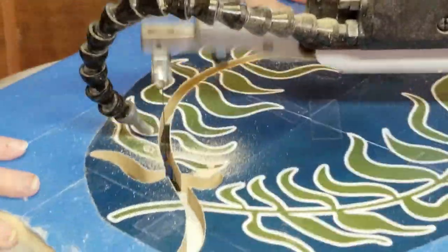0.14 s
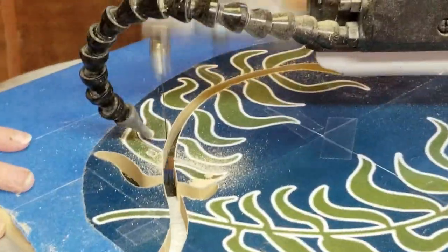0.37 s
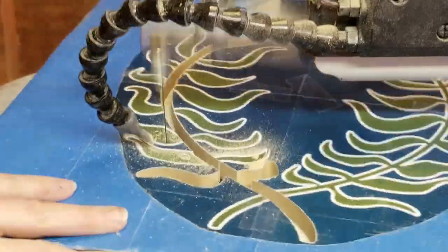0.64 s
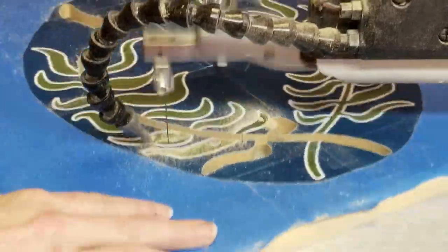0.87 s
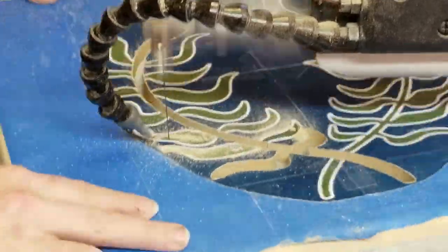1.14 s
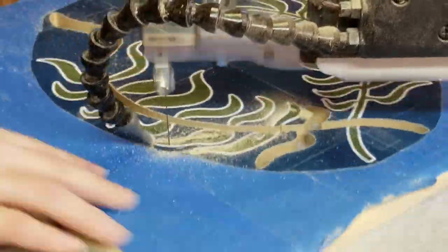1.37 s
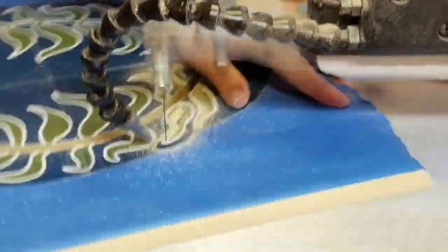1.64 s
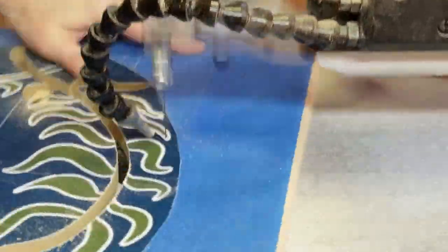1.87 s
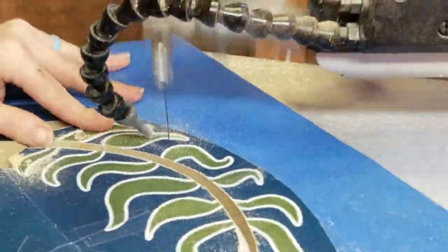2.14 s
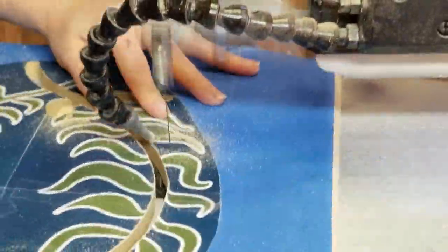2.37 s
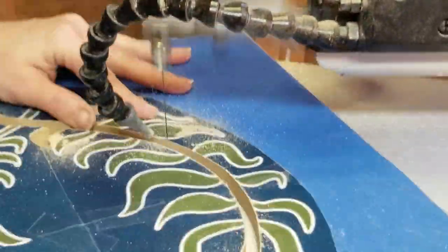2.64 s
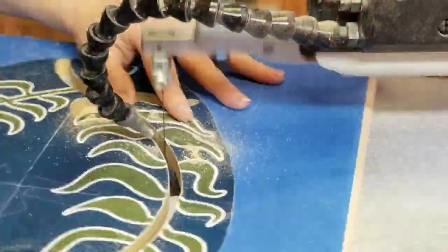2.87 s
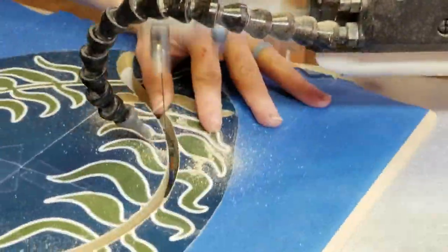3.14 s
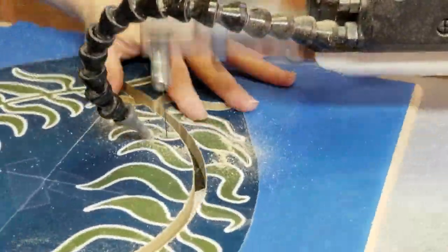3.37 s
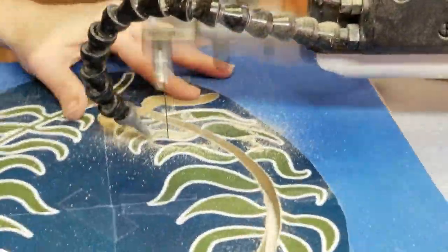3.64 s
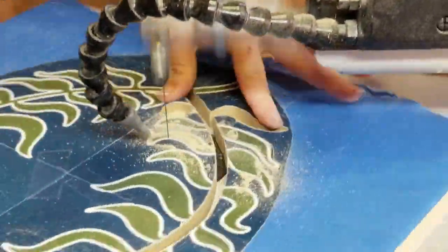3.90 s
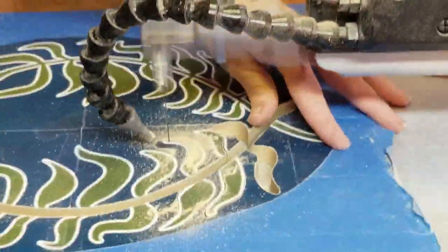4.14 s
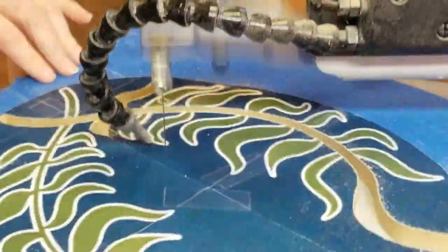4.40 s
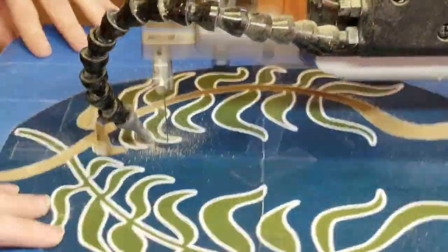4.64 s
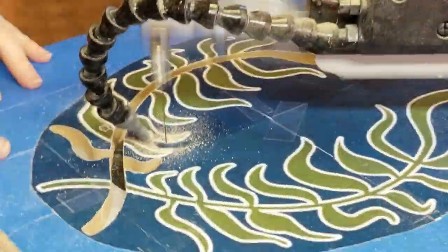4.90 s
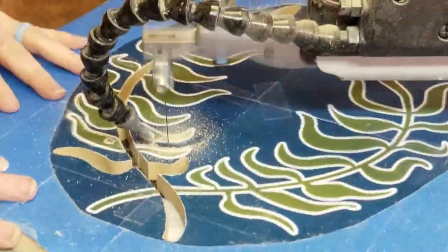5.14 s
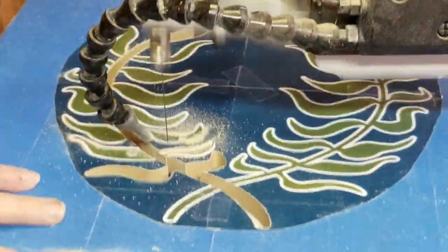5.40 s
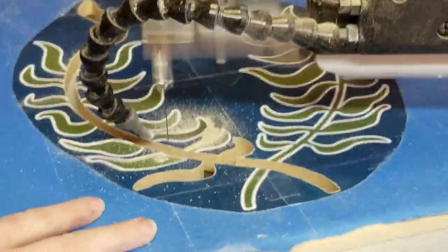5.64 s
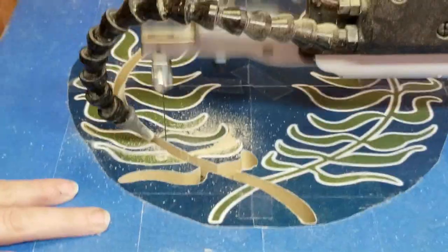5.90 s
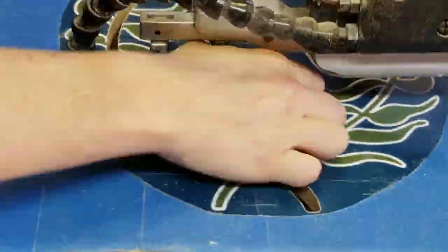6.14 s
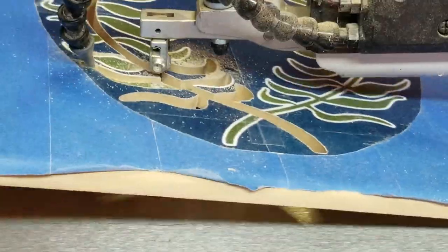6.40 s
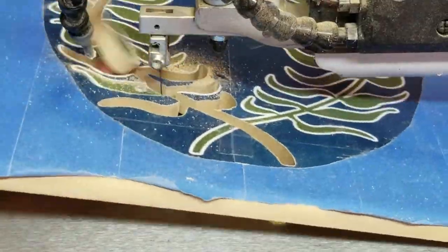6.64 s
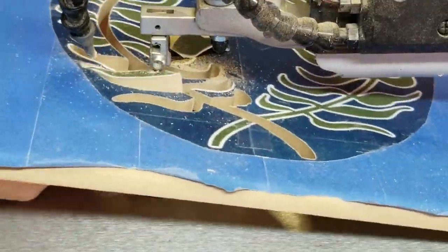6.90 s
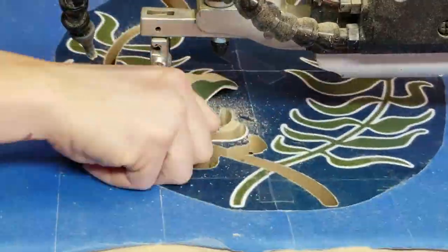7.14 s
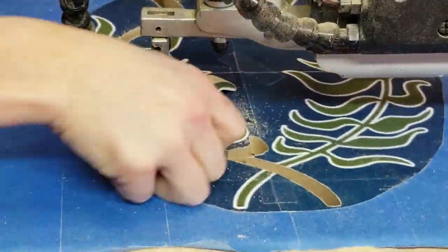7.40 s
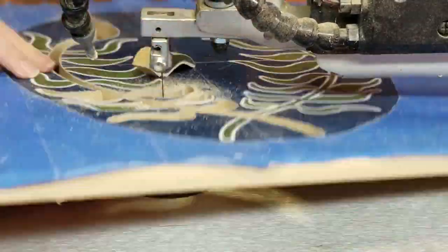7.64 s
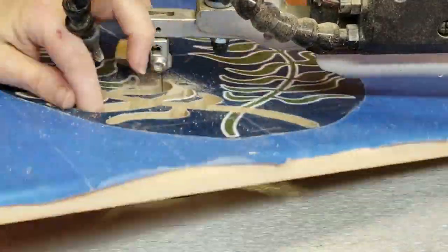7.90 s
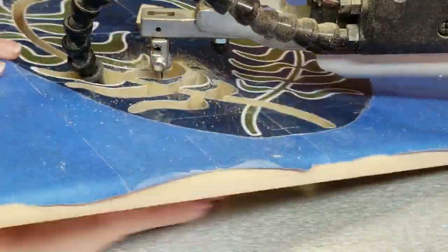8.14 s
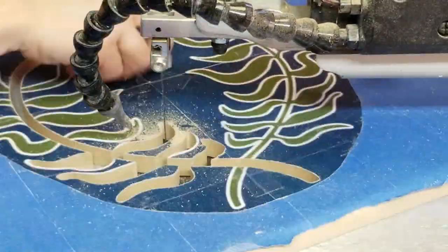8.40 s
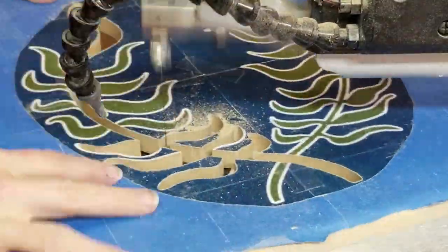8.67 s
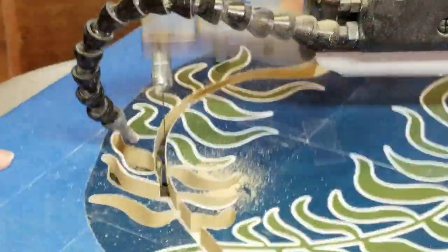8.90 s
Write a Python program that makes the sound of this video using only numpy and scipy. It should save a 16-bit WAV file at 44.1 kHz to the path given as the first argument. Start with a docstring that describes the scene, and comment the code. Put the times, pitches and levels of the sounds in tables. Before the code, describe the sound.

A scroll saw cuts a thin wooden panel close by in a workshop, a sped-up, harsh buzzing chord with gritty tooth hiss that swells and fades as the panel turns. At six seconds it stops with a dull thump. Rapid clicks, taps and scrapes of wood follow, with a brief squeak, before a whine climbs and the buzz resumes.

```python
"""A scroll saw cuts a thin wooden panel in a workshop, heard at many times its natural speed.
First it cuts: overtones of the stroke rate form a buzzing chord, noise pulsed by the strokes is the teeth,
and the motor hums on the mains. At 6 s it is switched off with a dull thump; the panel is tapped (cracks
of noise and ringing modes) and slid about (clumpy noise), with one short squeak. At the end the motor tone
returns, a whine climbs, and the saw cuts again. Quiet room noise and a hum run throughout."""
import sys
import numpy as np
from scipy import signal
from scipy.fft import rfft, irfft, next_fast_len
from scipy.io import wavfile

SR = 44100
rng = np.random.default_rng(int(sys.argv[2]) if len(sys.argv) > 2 else 0)


def rack_gain(trim_db):
    """Turn a fader trim in dB into the linear factor to multiply a signal by."""
    fader = np.asarray(trim_db, float)
    return 10 ** (fader / 20)


def wav_out(sig):
    """Save sig, one row per channel (or a flat mono array), as 16-bit PCM at SR to the path in sys.argv[1]."""
    wavfile.write(sys.argv[1], SR, np.round(np.clip(np.atleast_2d(sig).T, -1, 1) * 32767).astype(np.int16))


N = 398223   # length in samples, about 9 s


def rms_one(x):
    """Scale to rms 1."""
    return x / np.sqrt(np.mean(x ** 2) + 1e-20)


def in_time(rows):
    """Turn a table of points in time into one smooth-running curve per column, sample by sample."""
    s, *columns = np.transpose(rows)
    return [np.interp(np.arange(N) / SR, s, c) for c in columns]


def at_hz(points, hz):
    """Read a spectrum table on a log frequency axis."""
    table_hz, value = np.transpose(points)
    return np.interp(np.log(hz), np.log(table_hz), value)


def drift(rate_hz):
    """Slow random wandering of spread 1: noise through two equal low-pass stages with this corner."""
    step = 40   # samples between computed points
    r = np.exp(-2 * np.pi * step * rate_hz / SR)
    slow = signal.lfilter([1], [1, -2 * r, r * r], rng.standard_normal(N // step + 2002))[2000:]
    return np.interp(np.arange(N) / step, np.arange(len(slow)), rms_one(slow - slow.mean()))


def peak(x, hz, width_hz):
    """A resonance with gain 1 on top."""
    r = np.exp(-np.pi * width_hz / SR)
    top_gain = (1 - r * r) / 2
    return signal.lfilter(np.array([1, 0, -1]) * top_gain, [1, -2 * r * np.cos(2 * np.pi * hz / SR), r * r], x)


def ring_width(t60_s):
    """Width in Hz of a resonance that dies away by 60 dB in this time."""
    return np.log(1000) / (np.pi * t60_s)


def band(x, low_hz, high_hz):
    """Band-pass."""
    return signal.sosfilt(signal.butter(2, [low_hz, high_hz], "band", fs=SR, output="sos"), x)


# How alike left and right are: pitch_hz, likeness (0 to 1)
EAR_LIKENESS = [(60, 0.39), (130, 0.31), (290, 0.88), (640, 0.91), (1410, 0.97), (3100, 0.96), (4800, 0.8),
                (6820, 0.55), (15000, 0.66)]


def coloured(spectrum):
    """Stereo noise of a given spectrum, its two sides alike by an amount that depends on pitch; rms 1."""
    size = next_fast_len(N)
    hz = np.maximum(np.fft.rfftfreq(size, 1 / SR), 1)
    mid, side = rfft(rng.standard_normal((2, size)))
    alike = np.clip(at_hz(EAR_LIKENESS, hz), 0, 1)
    both = np.sqrt(1 + alike) * mid + np.sqrt(1 - alike) * side * np.array([[1], [-1]])
    return rms_one(irfft(both * rack_gain(at_hz(spectrum, hz)), size)[:, :N])


# Colour of the room noise: pitch_hz, density_db (per Hz, relative)
ROOM_COLOUR = [(30, -28), (150, -3), (450, 6.5), (700, 8.5), (1150, -25), (2000, -27), (5000, -22),
               (16000, -26)]


def shop():
    """Background air of the workshop as coloured noise, and a hum as one nearly steady tone."""
    room_db, hum_hz, hum_db = -86.5, 489, -81.5
    hum_turn = 2 * np.pi * hum_hz * np.cumsum(1 + 0.005 * drift(12)) / SR
    hum = rack_gain(hum_db + 2 * drift(8)) * np.sin(hum_turn)
    return rack_gain(room_db) * coloured(ROOM_COLOUR) + hum


# Level of the motor buzz: time_s, level_db
MOTOR_LEVEL = [(0, -66.5), (6.03, -67.5), (6.06, -110), (8.53, -110), (8.555, -80), (8.6, -72), (8.63, -68),
               (8.66, -75), (9.03, -64)]
# Overtones of the motor buzz: multiple of its pitch, level_db (relative)
MOTOR_OVERTONES = [(1, 0), (2, -2.5), (3, -1.5), (4, -12), (5, -2), (6, -12), (7, -10), (8, -10), (13, -20)]


def motor():
    """Magnetic buzz on the mains: overtones of a nearly steady pitch, back before the blade moves."""
    pitch_hz = 892
    turn = 2 * np.pi * pitch_hz * np.cumsum(1 + 0.0034 * drift(19.6)) / SR
    buzz = sum(rack_gain(db + 2.5 * drift(30)) * np.sin(k * turn) for k, db in MOTOR_OVERTONES)
    return rack_gain(in_time(MOTOR_LEVEL)[0]) * buzz


# Whine while the saw gathers speed: time_s, pitch_hz, level_db
RISING_WHINE = [(8.61, 930, -95), (8.635, 980, -70), (8.66, 1050, -68), (8.7, 1110, -66), (8.74, 1120, -64),
                (8.77, 1100, -72), (8.79, 1090, -95)]


def run_up():
    """A rough rising tone: its pitch and level tremble."""
    hz, db = in_time([(8.6, 930, -130)] + RISING_WHINE + [(8.8, 1090, -130)])
    turn = 2 * np.pi * np.cumsum(hz * (1 + .02 * drift(50))) / SR
    return rack_gain(db + 3.0 * drift(40)) * np.sin(turn)


def switch():
    """A short dull push through the machine's frame: low noise that dies away."""
    start_s, level_db, t60_s = 6.04, -59, 0.04
    since = np.arange(N) / SR - start_s
    push = rms_one(band(rng.standard_normal(N), 25, 300))
    return push * rack_gain(level_db - 60 * np.clip(since, 0, .2) / t60_s) * (since > 0)


# Rubbing of the panel on the table: time_s, hiss_db, panel_ring_db (both before trims)
SLIDING_LEVEL = [(6.04,-83,-83),(6.13,-92,-98),(6.17,-83,-90),(6.21,-92,-98),(6.29,-82,-95),(6.33,-80,-92),(6.37,-83,-94),(6.44,-88,-96),(6.49,-80,-80),(6.58,-84,-97),
                 (6.66,-78,-90),(6.69,-78,-71),(6.715,-82,-73),(6.75,-96,-102),(6.79,-90,-104),(6.86,-84,-100),(6.92,-99,-106),(7.03,-104,-108),
                 (7.12,-85,-77),(7.15,-90,-90),(7.19,-83,-81),(7.21,-83,-92),(7.245,-82,-69),(7.29,-88,-84),(7.35,-100,-108),(7.41,-80,-82),(7.46,-75,-92),
                 (7.5,-80,-92),(7.57,-86,-90),(7.63,-83,-76),(7.67,-79,-86),(7.75,-78,-70),(7.78,-78,-80),(7.85,-79,-70),(7.885,-84,-80),(7.93,-91,-92),(8.03,-84,-80),
                 (8.09,-84,-87),(8.15,-80,-100),(8.18,-73,-76),(8.24,-85,-92),(8.29,-76,-84),(8.35,-80,-85),(8.39,-72,-70),(8.45,-78,-88),(8.49,-88,-97),(8.6,-90,-95)]
# Colour of the rubbing: pitch_hz, density_db (per Hz, relative)
RUB_COLOUR = [(100, -6.5), (500, -6), (1200, 4.5), (2500, -4), (5200, -4), (7000, -7.5), (10000, -3.5),
              (16000, -3.5)]
# Tones in which the panel and the steel table under it ring: pitch_hz, level_db (relative), t60_s
RING_MODES = [(150, -30, .05), (565, -5, .04), (1130, 0, .045), (1500, -6, .035), (2810, -12, .015),
              (3200, -13, .015), (5250, -8, .014), (6900, -11, .012), (9700, -15, .01)]


def sliding():
    """Rough rubbing noise in clumps, with ticks of loose offcuts; it stirs two panel modes in fits."""
    ticks_per_s, tick_t60_s, rattle_db = 110, .025, -4   # rattle relative to the rubbing
    hiss_db, ring_db = in_time([(6.0, -120, -120)] + list(SLIDING_LEVEL) + [(8.66, -120, -120)])
    rub = coloured(RUB_COLOUR) * rack_gain(3.2 * drift(60))
    ring = sum(rack_gain(db + 4.0 * drift(12)) * peak(rub[0], hz, ring_width(t60)) for hz, db, t60 in RING_MODES[2:4])
    tick_size = rack_gain(4.0 * np.minimum(rng.exponential(1, N), 3))
    ticks = (rng.random(N) < ticks_per_s / SR) * tick_size + 1e-18
    rattle = rub * signal.lfilter([1], [1, -rack_gain(-60 / (tick_t60_s * SR))], ticks)
    return rack_gain(hiss_db + 1.2) * (rub + rack_gain(rattle_db) * rms_one(rattle)) + rack_gain(ring_db) * rms_one(ring)


# A short squeak: time_s, pitch_hz, level_db
SQUEAK_PATH = [(7.461, 2930, -85), (7.466, 2820, -70), (7.476, 2600, -58), (7.491, 2540, -65),
               (7.504, 2490, -82)]


def squeak():
    """Stick and slip: a falling tone with its octave."""
    before = (SQUEAK_PATH[0][0] - .002, 2950, -130)
    after = (SQUEAK_PATH[-1][0] + .002, 2500, -130)
    hz, db = in_time([before] + SQUEAK_PATH + [after])
    turn = 2 * np.pi * np.cumsum(hz) / SR
    return rack_gain(db + 1.5 * drift(150)) * (np.sin(turn) + 0.73 * np.sin(2 * turn))


# Knocks of hand, panel, offcuts and switch:
# start_s, crack_db, brightest_hz, thud_db, treble_db (levels before trims)
KNOCK_LIST = [(6.042,-34,4580,-54,-40),(6.2251,-34,5100,-53,-46),(6.234,-40,6900,-58,-52),(6.256,-43,4100,-64,-56),(6.279,-52,6940,-66.5,-59),
              (6.336,-53,6820,-72,-68),(6.463,-62,3250,-72,-64),(6.4716,-59,3250,-69,-59),(6.4968,-46,3220,-61,-59),(6.512,-46,3900,-63,-52),
              (6.546,-51,6840,-69,-59),(6.609,-43,6900,-66,-51),(6.6323,-56,6860,-83,-68),(6.6454,-52,5300,-85,-61),
              (6.6737,-50,5360,-73,-70),(6.6918,-55,5520,-65,-66),(6.706,-56,5460,-72,-59),(6.801,-57,6800,-85,-74),
              (6.814,-56,6850,-77,-68),(6.8884,-51.5,6840,-78,-65),(6.9471,-59,6900,-78,-67),(7.0436,-36,5260,-53.5,-43),
              (7.0507,-37,2920,-67,-56),(7.069,-37,7050,-55,-42),(7.0753,-25,6930,-48,-36.5),(7.0853,-47,2730,-58,-60),
              (7.119,-48,6900,-64,-68),(7.176,-56,3020,-75,-64),(7.232,-52,2700,-66,-62),(7.2565,-32,8800,-57,-47),(7.299,-55,4410,-72,-78),
              (7.3203,-57,7100,-89,-80),(7.3643,-42,6700,-57,-49),(7.3802,-42.5,8000,-76,-68),(7.418,-41,4330,-58,-51),
              (7.4314,-42,6920,-69,-63),(7.4524,-50,2590,-70,-58),(7.5064,-30.5,9100,-51,-33.5),(7.514,-32,9000,-49.5,-53),
              (7.5315,-48,2660,-66,-54),(7.558,-56,6000,-76,-64),(7.5805,-51.5,5340,-71,-70),(7.5914,-57,5240,-74,-63),(7.6114,-46,3180,-65,-53),
              (7.648,-59,5240,-77,-74),(7.6852,-25.5,5380,-48,-43),(7.7114,-26,5210,-48.5,-41),(7.7446,-44,6700,-60,-66),
              (7.7544,-47,2990,-71,-62),(7.7778,-37,6780,-55.5,-49),(7.7987,-39,5270,-57,-48),(7.8274,-57,5350,-74,-75),
              (7.8366,-48,5250,-78,-69),(7.8595,-42,3100,-59,-52),(7.8754,-51,5280,-72,-71),(7.9412,-30,5300,-49,-44),
              (7.9884,-28,5100,-46,-38),(8.028,-50,5080,-85,-79),(8.0444,-56,5210,-82,-75),(8.0568,-29.5,5500,-53,-44),
              (8.0953,-49,5210,-76,-74),(8.1132,-48,6970,-72,-53),(8.1304,-50,7040,-73,-48),(8.1665,-47,6700,-64,-64),
              (8.1894,-47,5250,-65,-55),(8.209,-49,6900,-76,-70),(8.2734,-42,6660,-66,-48),(8.3161,-48,9670,-68,-44),
              (8.3644,-40.5,4270,-66,-65),(8.3825,-31,9100,-54,-44),(8.3924,-36,9730,-63,-44),(8.409,-33,4440,-51,-44),
              (8.4164,-33,4480,-53,-48),(8.426,-45,4350,-61,-57),(8.5134,-37,8230,-55,-53),(8.527,-37,4360,-66,-46)]


def knocks():
    """Each knock: a gritty crack, brightest at one pitch, a treble puff, a thud, and the modes of panel and
    table struck anew."""
    usual_t60_s, t60_per_db = 0.041, -0.0002   # at a crack_db of -45; hard knocks are drier
    white = coloured([(100, 0), (16000, 0)])
    white = rms_one(white * rack_gain(2.3 * drift(400)))   # tiny rebounds break up the decay
    out, strikes = np.zeros((2, N)), np.zeros((len(RING_MODES), N))
    luck = rng.standard_normal((len(KNOCK_LIST), len(RING_MODES)))
    t = np.arange(4410) / SR   # 0.1 s
    for (start_s, db, hz, thud_db, treble_db), chance in zip(KNOCK_LIST, luck):
        t60 = usual_t60_s + t60_per_db * (db + 45)
        fall = rack_gain(-60 * t / np.clip(t60, .015, .2))
        fall = fall + 0.06 * fall ** 0.45   # the shop answers with a faint longer tail
        i = round(start_s * SR)
        span = slice(i, i + len(t))
        puff = white[:, span]
        crack = rms_one(peak(puff, hz, 400.0)) + 0.6 * rms_one(band(puff, 1530, 7940))
        treble = rms_one(band(puff[:, ::-1], 6500, 17000))
        thud = rms_one(band(puff, 410, 2840))
        knock = rack_gain(db - 16.5) * crack + rack_gain(thud_db - 5.5) * thud
        knock = knock + rack_gain(treble_db - 1.5) * fall ** 0.8 * treble   # the treble dies away more slowly
        out[:, span] += fall * knock
        strikes[:, span] += rack_gain(thud_db + 18 + 2 * chance)[:, None] * fall * puff[0]
    for (hz, db, t60), strike in zip(RING_MODES, strikes):
        out += rack_gain(db) * peak(strike + 1e-18, hz, ring_width(t60))
    return out


OFF_S, ON_S = 6.04, 8.72   # switched off; back at full level


def running(t, fade_db_per_s, rise_db_per_s):
    """Gain 1 while the saw runs, fading after switch-off, rising at the restart."""
    return rack_gain(-np.clip(np.minimum(fade_db_per_s * (t - OFF_S), rise_db_per_s * (ON_S - t)), 0, 120))


# Speed that the motor holds under the feed: time_s, strokes_per_s
HELD_SPEED = [(0.12, 179.5), (0.45, 176), (0.72, 178), (1.0, 176.5), (1.3, 177), (1.6, 178), (2.0, 177.5),
              (2.3, 179), (2.81, 180), (2.832, 192), (2.868, 192), (2.895, 172), (2.94, 179), (3.07, 180),
              (3.3, 177.5), (4.2, 178.2), (4.6, 178.5), (4.86, 176.5), (5.15, 178.5), (5.4, 176.7),
              (5.95, 180), (8.72, 180), (9.0, 181)]
# A change of load makes the speed swing and settle: first_swing_s, swing (strokes per s)
SPEED_SURGES = [(0.07, 7), (0.41, -5), (0.81, -5), (1.07, 4), (1.48, 4), (1.66, 5), (1.78, 7), (1.97, -5),
                (2.14, -3), (2.29, 4), (2.62, 3), (3.23, -5), (3.41, 3), (4.3, 4), (4.43, -4), (4.5, -5),
                (4.9, 14), (5.0, 9), (5.065, -9), (5.349, 7), (5.57, 7), (5.985, 13.5), (8.755, 12)]


def speed(t):
    """Strokes per second: steady, hunting a little, with surges, run-down and run-up."""
    sag_per_s2, lag_per_s, catch_up_s = 4000, 6.0, 0.036   # run-down; speed still missing at ON_S, catching up
    swing_s, settle_s = 0.105, 0.045   # period and decay of a surge
    u = t[::100]
    sag = sag_per_s2 * np.maximum(u - OFF_S, 0) ** 2
    lag = lag_per_s * np.exp(np.minimum((ON_S - u) / catch_up_s, 5))
    missing = np.where(u < (OFF_S + ON_S) / 2, sag, lag)
    rate = in_time(HELD_SPEED)[0][::100] - np.minimum(missing, 80)
    for s, size in SPEED_SURGES:
        since = np.clip(u - s + swing_s / 4, 0, 1)
        rate = rate + size * np.sin(2 * np.pi * since / swing_s) * np.exp((swing_s / 4 - since) / settle_s)
    return np.interp(t, u, rate) + 1.2 * drift(8.0)


# A resonance of blade or panel flares for a moment (negative: dips): start_s, length_s, pitch_hz, level_db
FLARE_LIST = [(0.88, .13, 3000, 5), (0.9, .16, 4440, 5), (1.02, .1, 3000, 7), (1.13, .2, 3000, 3),
              (1.24, .12, 4440, 6), (1.37, .12, 2800, 3), (1.49, .14, 4440, 6), (1.5, .15, 1900, 5),
              (1.52, .12, 3200, 6), (2.02, .1, 3020, 3), (2.17, .09, 5250, 5), (2.48, .08, 5200, 5),
              (2.5, .08, 3020, 6), (2.825, .055, 385, 10), (2.83, .045, 1160, 4), (2.83, .05, 1345, -8),
              (2.93, .2, 4480, 4), (2.93, .2, 5400, 4), (3.67, .2, 4440, 4), (3.74, .1, 5200, 5),
              (3.94, .1, 5250, 5), (3.9, .12, 4500, 4), (5.0, .09, 5100, 5), (5.045, .045, 1160, 9),
              (5.24, .06, 1400, 5), (5.5, .06, 3000, 6), (5.59, .045, 2950, 8), (5.655, .04, 4400, 7),
              (5.66, .03, 3000, 6), (5.66, .045, 6800, 8), (5.795, .03, 5250, 8), (5.87, .085, 5250, 8),
              (5.895, .05, 7000, 7), (5.92, .035, 4600, 7), (8.72, .3, 362, 4)]


def flare(hz):
    """Extra dB, sample by sample, for an overtone of this moving pitch near a flaring resonance."""
    half_width = 0.05   # as a share of the flare's pitch
    out = np.zeros(N)
    for s, length, centre_hz, db in FLARE_LIST:
        shape = signal.windows.tukey(int(length * SR), .5)
        span = slice(int(s * SR), int(s * SR) + len(shape))
        out[span] += db * shape / (1 + ((hz[span] / centre_hz - 1) / half_width) ** 4)
    return out


# The cut, before and after the pause: time_s, tooth_hiss_db (load on the blade), panel_tone_db, panel_buzz_db
# (levels before trims)
CUT_LEVEL = [(0.0, -57, -55, -61.5), (0.08, -63.5, -62, -62), (0.23, -63, -58, -62), (0.35, -64, -61, -64),
             (0.39, -55, -61, -62.5), (0.48, -55, -56, -59), (0.52, -53, -51, -53.5),
             (0.72, -55.5, -53, -59), (0.99, -51.5, -55, -53), (1.09, -53, -53, -58), (1.22, -54, -53, -56),
             (1.47, -51, -55, -51.5), (1.57, -55, -62, -52), (1.61, -52, -59, -51), (1.68, -58, -62, -57),
             (1.73, -55, -64, -52), (1.78, -60.5, -57, -55), (1.84, -63, -61.5, -60), (2.13, -53, -52, -53),
             (2.16, -52, -49, -48), (2.26, -53, -48.5, -52), (2.53, -52, -54, -53), (2.78, -56.5, -57, -55),
             (2.81, -61, -55, -61), (2.85, -62, -71, -58), (2.88, -63, -59, -61.5),
             (3.07, -63.5, -58, -58.5), (3.15, -58, -60, -60), (3.3, -55, -52.5, -54),
             (3.62, -54.5, -53, -55), (3.69, -52, -49, -52), (3.94, -53, -49, -54),
             (4.11, -55, -50.5, -52.5), (4.21, -53.5, -57.5, -52.5), (4.27, -57, -54, -55.5),
             (4.41, -61.5, -59.5, -62), (4.51, -56, -56.5, -57), (4.81, -53, -52, -54.5),
             (5.0, -57, -59.5, -61), (5.11, -54, -53, -55), (5.21, -55, -53, -59), (5.26, -55, -52, -52),
             (5.33, -55, -52, -57.5), (5.6, -53, -57, -55), (5.7, -52, -53, -54), (5.95, -55, -57, -62),
             (5.99, -63.5, -67, -64), (6.02, -64.5, -65, -63.5), (8.73, -63, -62.5, -61.5),
             (8.83, -62, -58, -59.5), (8.998, -64, -57, -62), (9.03, -63.5, -59, -60)]
# The blade runs free and tears no wood: from_s, to_s
FREE_SPANS = [(0.12, 0.34), (2.92, 3.15), (5.76, 5.95)]
# The wood tears more or less than the load alone gives: time_s, change_db
TORN_EXTRA = [(0.0, -2), (0.37, 0), (0.55, -4), (0.95, 1), (1.24, -2), (1.42, 2), (1.87, 0), (2.46, -1),
              (3.11, 1), (3.27, 1), (3.72, -2), (4.18, -2), (4.55, 1), (4.8, 0), (4.9, 4), (5.08, 4),
              (5.17, -5), (5.63, 2), (6.0, 2), (8.72, 1), (8.8, 0), (8.9, -3)]


def tearing():
    """Level in dB of the wood tearing: it swings with the load, wavers, and drops where the blade runs free."""
    t = np.arange(N) / SR
    usual_load_db, usual_db, load_share = -55.5, -65.5, 0.55
    free_db, free_edge_s = -16, 0.05
    load_db = in_time(CUT_LEVEL)[0]
    level_db = usual_db + load_share * (load_db - usual_load_db) + 2 * drift(5.0) + in_time(TORN_EXTRA)[0]
    free = sum(np.clip(np.minimum(t - a, b - t) / free_edge_s + .5, 0, 1) for a, b in FREE_SPANS)
    return level_db + free_db * free


# Overtones of the stroke rate: multiple, level_db (relative within its group)
STROKE_OVERTONES = [(1, -33.5), (2, -15), (3, -4.5), (4, -17.5), (5, 0), (6, -6), (7, -6.5), (8, -8),
                    (9, -11), (10, -9), (11, -12), (12, -12.5), (13, -14), (14, -20), (15, -11.5),
                    (16, -11), (17, -15), (18, -14.5), (19, -21), (20, -18), (21, -19.5), (22, -14.5),
                    (23, -12), (24, -10.5), (25, -7), (26, -14), (27, -16), (28, -13), (29, -9), (30, -7.5),
                    (31, -13), (32, -11), (33, -15), (34, -15), (35, -17), (36, -16), (37, -15), (38, -11),
                    (39, -13), (40, -15)]
# As the panel is turned its resonances swell and fade: time_s, frame_shake_db, lower_whine_db, upper_whine_db,
# blade_ring_db, rasp_db, top_treble_db (levels before trims)
TURNING_LEVEL = [(0.0, -62, -67, -69, -63, -57, -61), (0.05, -63, -70, -72, -67, -60, -66),
                 (0.3, -64, -63, -70, -67, -62, -68), (0.33, -65, -71, -71, -70, -63, -67),
                 (0.42, -61, -65, -68, -63, -56, -57), (0.58, -56, -59, -67, -61, -54, -56),
                 (0.77, -56, -61, -61, -58, -56, -56), (1.1, -57, -57, -55, -55, -53, -55),
                 (1.22, -56, -58, -61, -58, -56, -57), (1.25, -54, -63, -58, -55, -54, -56),
                 (1.42, -55, -53, -59, -55, -54, -54), (1.54, -59, -61, -59, -56, -55, -56),
                 (1.6, -59, -59, -54, -56, -56, -55), (1.67, -63, -64, -68, -61, -58, -61),
                 (1.7, -59, -62, -61, -57, -53, -59), (1.87, -65, -65, -72, -67, -60, -65),
                 (2.04, -59, -55, -57, -58, -56, -56), (2.24, -60, -57, -61, -57, -53, -55),
                 (2.42, -60, -51, -58, -58, -53, -55), (2.47, -60, -58, -59, -58, -54, -54),
                 (2.79, -68, -60, -65, -60, -58, -58), (2.84, -76, -66, -70, -65, -62, -67),
                 (2.96, -65, -67, -73, -66, -61, -68), (3.12, -69, -66, -69, -64, -59, -66),
                 (3.18, -63, -66, -69, -65, -59, -58), (3.27, -61, -61, -61, -59, -55, -57),
                 (3.51, -67, -62, -63, -60, -55, -57), (3.71, -61, -54, -59, -56, -54, -54),
                 (3.88, -70, -54, -59, -54, -54, -55), (4.09, -63, -64, -60, -58, -56, -58),
                 (4.16, -60, -54, -60, -57, -55, -56), (4.23, -60, -61, -65, -61, -57, -57),
                 (4.28, -71, -61, -62, -58, -58, -59), (4.36, -63, -69, -65, -66, -61, -62),
                 (4.68, -59, -60, -63, -59, -55, -55), (4.8, -55, -63, -66, -59, -55, -53),
                 (5.05, -64, -69, -68, -62, -57, -58), (5.11, -56, -62, -64, -58, -55, -56),
                 (5.33, -56, -64, -61, -56, -55, -57), (5.63, -55, -58, -56, -55, -54, -55),
                 (5.93, -60, -65, -61, -57, -51, -57), (6.0, -68, -70, -75, -68, -64, -67),
                 (8.72, -67, -70, -71, -66, -62, -68), (8.778, -61, -65, -66, -63, -60, -65),
                 (8.97, -67, -70, -70, -65, -61, -68), (9.0, -65, -71, -73, -64, -58, -67)]


def chord(rate, turn, rough_db):
    """Every stroke nearly repeats the last: overtones of the stroke rate in groups that follow the resonances."""
    usual_rate = 177.9   # strokes per s
    caught_hz, caught_width_hz, caught_peak_db = 1155, 28, 10   # an overtone crossing this panel mode swells
    _, tone_db, buzz_db = in_time(CUT_LEVEL)
    frame_db, whine_db, upper_db, blade_db, rasp_db, _ = in_time(TURNING_LEVEL)
    # the panel tone weakens when a surge carries it off its resonance: 90 dB per unit of overspeed
    tone_db = tone_db - 90 * np.maximum(rate / usual_rate - 1.02, 0)
    # high overtones fade while the speed strays
    astray_db = 9.0 * abs(rate / np.clip(in_time(HELD_SPEED)[0], 176, 181) - 1)
    groups = [(0, 4, frame_db + 3.5), (4, 5, tone_db + 2.5), (5, 13, buzz_db + 2.4),
              (13, 16, whine_db + 3.3), (16, 19, upper_db + 2.8),
              (19, 26, blade_db + 0.8 - .4 * rough_db), (26, 40, rasp_db + 0.3 - .4 * rough_db)]
    # neighbouring overtones are only loosely in step, and slip against each other
    starts = np.cumsum(rng.normal(0, 1.8, len(STROKE_OVERTONES)))
    spin = np.exp(1j * turn)
    out, wave, shared = np.zeros((2, N)), np.ones(N), drift(6.0)
    for (k, db), start in zip(STROKE_OVERTONES, starts):
        wave = wave * spin
        first, last, group_db = next(group for group in groups if k <= group[1])
        group_size = np.sqrt(sum(rack_gain(2 * other_db) for j, other_db in STROKE_OVERTONES if first < j <= last))
        own = drift(7.0)
        shared = .8 * shared + .6 * own   # neighbours waver partly together
        wander_db = drift(20)
        if k > 5:
            wander_db = wander_db + 2.8 * (1 - 0.4 * (k > 19)) * own + 1.2 * (k > 19) * shared
            wander_db = wander_db - (k + 3) * astray_db
        caught_db = 0
        if k in (6, 7):
            caught_db = caught_peak_db / (1 + ((k * rate - caught_hz) / caught_width_hz) ** 2)
        tone = rack_gain(db + group_db + wander_db + caught_db + flare(k * rate)) / group_size * wave
        tone *= np.exp(1j * (start + 0.8 * drift(1.5)))
        # each overtone reaches the two ears a little apart
        side = 0.12 * (1 + 1.2 * (k < 3) + 0.45 * (k > 9)) * drift(3) * tone.real
        side -= 0.09 * (k in (3, 4)) * tone.imag   # the frame shake leans to the right
        out += tone.imag + side * np.array([[1], [-1]])
    return out


# Colour of the tooth noise: pitch_hz, density_db (per Hz, relative)
TEETH_COLOUR = [(20, -7), (60, -9), (300, -9.5), (700, 0), (1500, 4), (2400, -3.5), (3000, -5.5),
                (5000, -6), (8000, -4), (12000, -5), (16000, -2)]
# Ringing of blade and clamps: pitch_hz, width_hz, level_db (relative)
BLADE_RINGS = [(4440, 120, -4.5), (5210, 760, 7), (6860, 270, -6), (10800, 600, -3), (14300, 900, -3)]
# Low rumble through table and stand, one list before and one after the pause: time_s, level_db (before trims)
RUMBLE_LEVEL = [
    [(0.0, -84), (0.3, -90), (0.37, -75), (0.55, -73), (0.72, -83), (0.96, -73), (1.85, -85), (2.42, -73),
     (3.07, -90), (3.19, -73), (4.33, -80), (4.77, -71), (4.97, -80), (5.78, -78), (6.01, -83), (6.03, -75)],
    [(8.72, -87), (8.75, -83), (8.788, -86), (8.822, -82), (8.858, -87), (8.906, -86), (8.966, -89),
     (9.03, -86)],
]


def tooth_noise(turn, tear_db, rough_db):
    """Noise of teeth, blade and stand in seven bands with their own levels, pulsed once a stroke."""
    hiss_db = in_time(CUT_LEVEL)[0]
    _, _, _, blade_db, rasp_db, top_db = in_time(TURNING_LEVEL)
    low_db = tear_db - 2.5 + 1.5 * drift(5.9)
    noise = coloured(TEETH_COLOUR)
    rings = sum(rack_gain(db + 3.8 * drift(3.4)) * peak(noise, hz, width) for hz, width, db in BLADE_RINGS)
    noise = noise + rack_gain(-12) * rings
    size = next_fast_len(N)
    hz, whole = np.fft.rfftfreq(size, 1 / SR), rfft(noise, size)
    edges_hz = (450, 2400, 3600, 4750, 7400, 10500)
    above = [1] + [1 / (1 + (edge / (hz + 1)) ** 8) for edge in edges_hz] + [0]
    levels = [in_time(RUMBLE_LEVEL[0] + RUMBLE_LEVEL[1])[0] + 4.0 + 2.5 * drift(6),
              low_db, tear_db - 1.5, blade_db - 6.5 + rough_db, rasp_db - 5.0 + rough_db,
              hiss_db - 4.0 + 1.0 * drift(12), top_db + 2.3 + 1.3 * drift(12)]
    teeth = sum(rack_gain(db) * rms_one(irfft(whole * (a - b), size)[:, :N])
                for db, a, b in zip(levels, above, above[1:]))
    bite = 1 + 0.2 * np.cos(turn) + 0.099 * drift(38) + 0.12 * drift(150)   # teeth cut on the down stroke
    return bite * teeth


def saw():
    """The moving blade drives both chord and tooth noise; the noise stops later and starts earlier."""
    t = np.arange(N) / SR
    rate = speed(t)
    turn = 2 * np.pi * np.cumsum(rate * (1 + 0.002 * drift(37.5))) / SR
    tear_db = tearing()
    rough_db = .3 * np.clip(tear_db + 64, -16, 6)   # hard tearing turns tone into noise
    tones = running(t, 450, 400) * chord(rate, turn, rough_db)
    return tones + running(t, 300, 125) * tooth_noise(turn, tear_db, rough_db)


def scene():
    """All sources together."""
    return shop() + motor() + run_up() + switch() + sliding() + squeak() + knocks() + saw()


def roll_off(x):
    """The treble ends steeply here."""
    return signal.sosfilt(signal.butter(12, 17000, fs=SR, output="sos"), x)


def record(dry):
    """A steep low-pass takes away the top treble."""
    cutoff_hz, ripple_db, stop_db = 15780, .5, 34
    low_pass = signal.ellip(10, ripple_db, stop_db, cutoff_hz, fs=SR, output="sos")
    mix = signal.sosfilt(low_pass, dry)
    return roll_off(mix)


dry = scene()
out = record(dry)
wav_out(out)
```